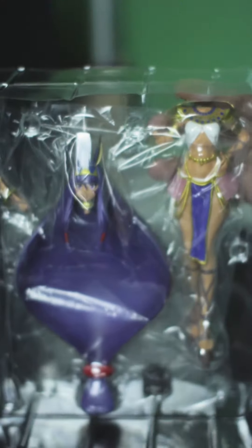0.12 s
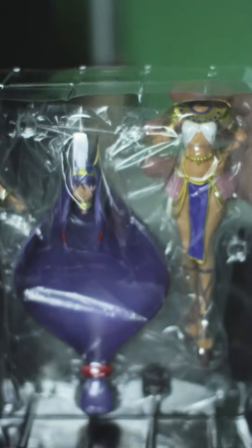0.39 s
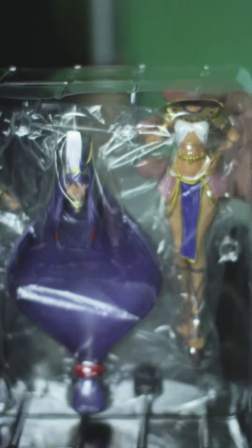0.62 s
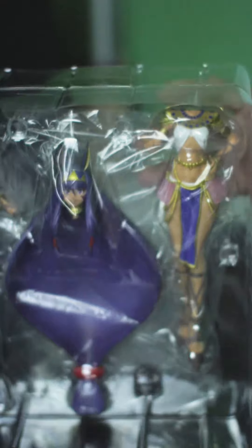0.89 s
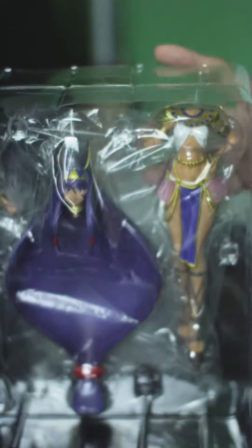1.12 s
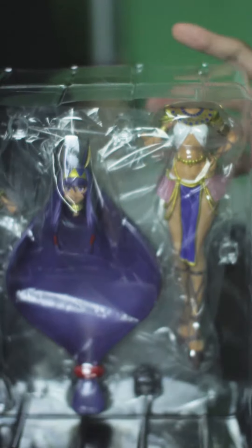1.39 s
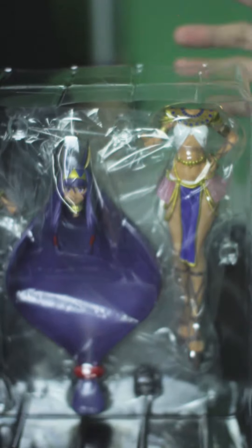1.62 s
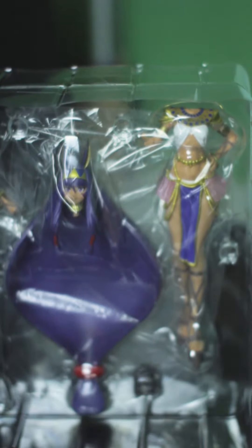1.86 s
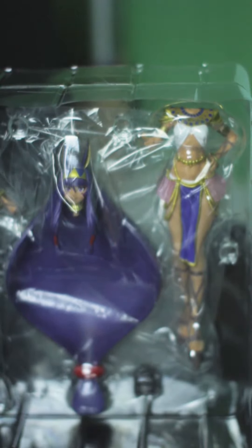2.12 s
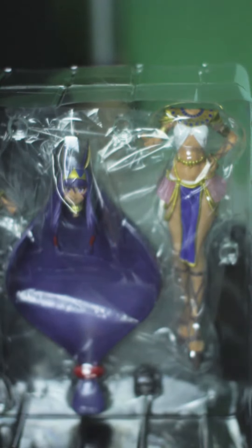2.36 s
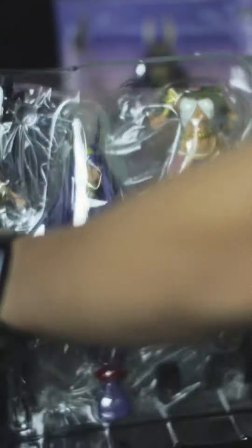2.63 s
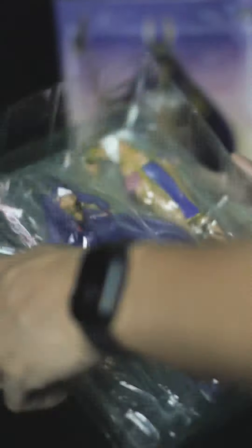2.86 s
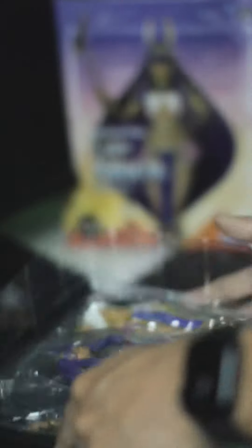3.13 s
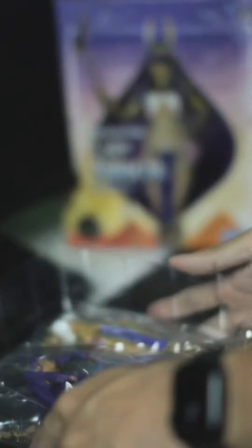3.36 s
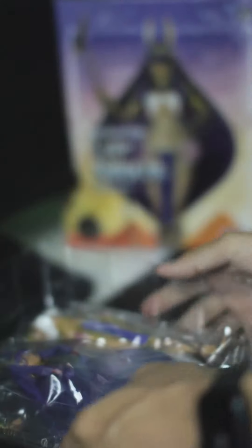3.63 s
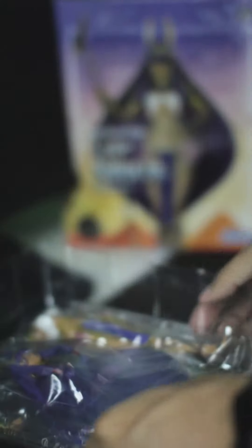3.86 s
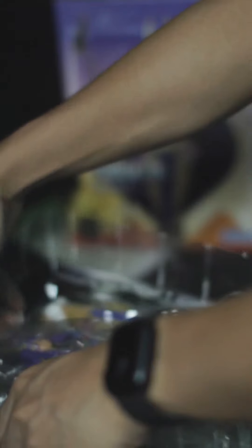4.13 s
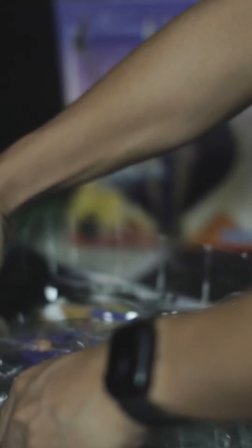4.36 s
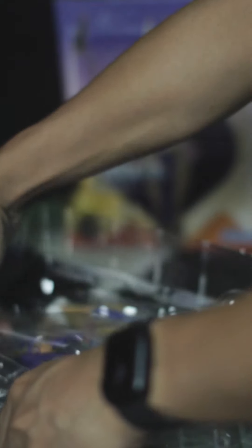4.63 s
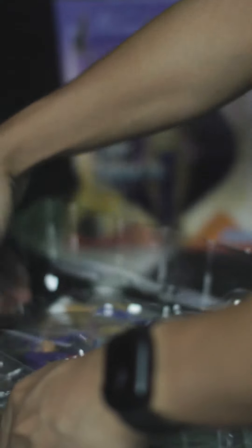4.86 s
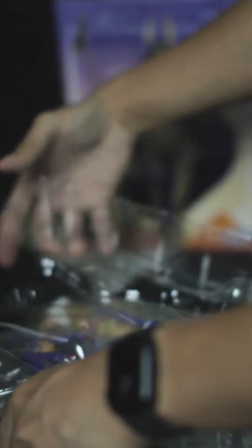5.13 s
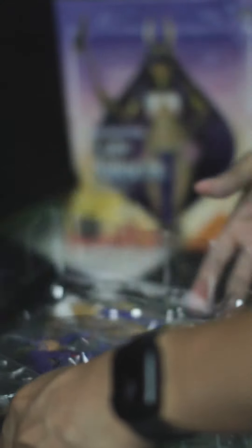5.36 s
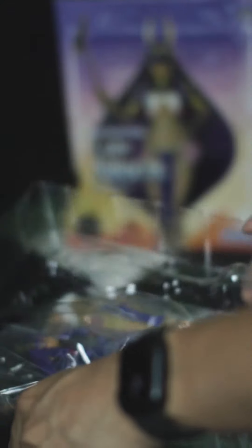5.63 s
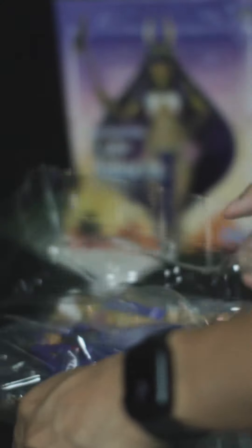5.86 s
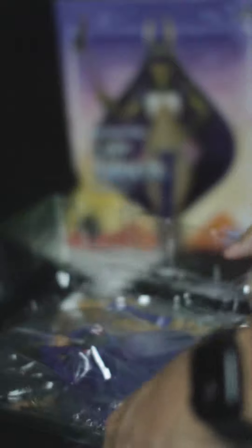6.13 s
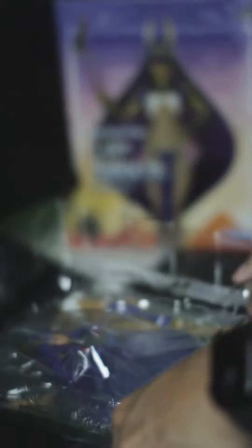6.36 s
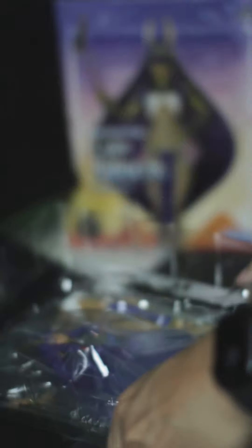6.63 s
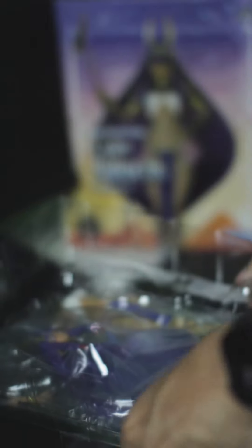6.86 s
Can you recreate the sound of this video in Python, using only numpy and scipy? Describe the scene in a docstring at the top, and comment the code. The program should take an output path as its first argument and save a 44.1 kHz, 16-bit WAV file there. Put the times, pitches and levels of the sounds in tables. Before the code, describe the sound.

Close to the microphone in a small, quiet room, hands handle a stiff clear-plastic tray. At first only faint ticks and light film rustles over a low fan hum; then a burst of crinkling as it is lifted and lowered, dense sharp buckling pops, one very loud snap, dull table thumps and more crackling to the end.

```python
"""Stiff plastic tray prised apart

Hands lift a clear-plastic tray, lay it on a table and prise its halves apart in a small quiet room.
The thin shell's modes ring to buckling pops and to rustling grains under the fingers.
Knocks on the table are swings that slow as they die; shifting adds lumpy rumble. Plastic squeaks briefly
on plastic by regular stick-slip. Two fan hums at close pitches beat over shaped room noise."""
import sys
import numpy as np
from scipy import signal
from scipy.fft import rfft, irfft, next_fast_len
from scipy.io import wavfile

SR = 44100
rng = np.random.default_rng(int(sys.argv[2]) if len(sys.argv) > 2 else 0)


def gain_from_db(level_db):
    """Convert decibel levels to linear amplitude factors (20 dB per decade)."""
    decades = np.asarray(level_db, float) / 20
    return 10 ** decades


def int16_out(signal):
    """Quantize to a 16-bit WAV file."""
    q = np.round(np.clip(np.atleast_2d(signal).T, -1, 1) * 32767)
    wavfile.write(sys.argv[1], SR, q.astype(np.int16))


N = 308700

# Room noise spectrum. Each row: frequency in Hz, relative density in dB.
ROOM_NOISE_SPECTRUM = [(15, -54), (25, -117), (72, -49.5), (102, 2), (223, 20.5), (326, 11), (695, -1),
                       (988, -5.5), (2690, -11), (3520, -6.5), (5280, -14.5), (14800, -18), (16000, -29.5)]
# Fan hums. Each row: pitch in Hz, mean level in dB rms.
FAN_HUMS = [(92.9, -58.5), (100.2, -62)]
# Knocks through the table. Each row: start in seconds, level in dB, nominal pitch in Hz, t60 in seconds.
TABLE_KNOCKS = [(0.121, -24.5, 337, 0.025), (1.198, -30, 696, 0.0035), (2.256, -23.5, 127, 0.057),
                (2.3, -26, 85, .06), (2.356, -15.5, 198, 0.006), (2.376, -33, 85, 0.072),
                (4.536, -17.5, 235, 0.13), (4.101, -38, 120, 0.033), (5.23, -6, 209, 0.018),
                (5.2377, -10.5, 105.6, 0.035), (5.4285, -5, 270, 0.014), (6.131, -28.5, 159, 0.09),
                (6.425, -18, 154, 0.015), (6.268, -25, 206, 0.029), (6.367, -32, 110, 0.031),
                (6.526, -18, 322, 0.054), (6.531, -11.5, 171, 0.023), (6.694, -19.5, 129, 0.023),
                (6.898, -39, 120, 0.07)]
# Tray shifting on the table. Each row: time of the crest in seconds, rumble in dB rms, fade in dB per second.
TRAY_SHIFTS = [(2.26, -35, 111), (3.242, -30.5, 250), (4.11, -49, 95), (4.548, -32.5, 231.5),
               (5.9, -54, 18), (6.3, -45, 48), (6.44, -48, 132), (6.7, -59, 69)]
# Plastic on plastic. Each row: start in seconds, length in seconds, level of the lowest tone in dB,
# slips per second in Hz.
PLASTIC_SQUEAKS = [(2.823, .025, -48.5, 697), (2.867, .055, -38.5, 500)]
# Shell buckling. Each row: start in seconds, relative level in dB, brightness in dB,
# pitch of the buckling panel in Hz, buckling time in seconds.
SHELL_POPS = [(.033, -41, 0, 480, 0.0014), (.084, -48.5, 25.5, 580, 0.0061), (.12, -22, -26, 890, 0.0022),
              (.209, -48, 20.5, 1420, 0.013), (.276, -52.5, 28, 1330, 0.0044),
              (.521, -41.5, 11.5, 490, 0.0055), (.612, -32, -5.5, 370, 0.0065), (.778, -47, -7, 334, .004),
              (1.08, -45.5, 12, 370, 0.008), (1.199, -52.5, 4, 390, 0.0031),
              (1.321, -46.5, 12.5, 970, 0.0061), (2.241, -50, 19, 1290, 0.0074),
              (2.252, -30.5, 8, 1070, 0.014), (2.322, -32, 7.5, 516, 0.009),
              (2.397, -45.5, 31.5, 323, 0.0021), (2.575, -30.5, -10, 560, 0.0026),
              (2.609, -26.5, 17, 1290, 0.028), (2.647, -25, 10, 1250, 0.0044),
              (2.668, -34, -12, 566, 0.0058), (2.695, -34, 10, 465, 0.0064), (2.706, -30, 25, 910, 0.011),
              (2.715, -17, 13, 504, 0.0018), (2.719, -16.5, 13, 514, 0.0067), (2.78, -25, -8, 490, .0044),
              (2.822, -37, 1, 710, 0.0031), (2.931, -27.5, 12, 1010, 0.003),
              (2.983, -36.5, 16.5, 380, 0.0074), (3.101, -56, -11, 1200, 0.0036),
              (3.166, -29.5, 11, 1340, 0.01), (3.231, -12.5, 0.5, 580, 0.0066),
              (3.259, -5.5, -22, 1383, 0.0019), (3.299, -31.5, 15.5, 915, 0.0036),
              (3.385, -21, -25, 660, 0.012), (3.402, -9, -14, 1580, 0.0046), (3.468, -4, -5, 710, 0.0054),
              (3.496, -13.5, -12, 1190, 0.014), (3.507, -17, -9, 640, 0.0028),
              (3.534, -16, -3.5, 626, 0.0032), (3.565, -25, -4.5, 657, 0.0018),
              (3.627, -22, -3.5, 910, 0.0041), (3.727, -35.5, -18, 990, 0.0016),
              (3.823, -37, -6, 304, 0.011), (3.951, -16.5, -21, 1175, .0027), (4.007, -18, 0, 454, 0.01),
              (4.019, -13.5, 0.5, 768, 0.0058), (4.087, -23, -3, 770, 0.0028),
              (4.215, -28, -10, 1220, 0.01), (4.322, -38.5, 12, 890, .005), (4.349, -38.5, 19, 1360, .002),
              (4.46, -48, 18, 780, 0.0066), (4.533, 8.5, -6, 1146, 0.0033), (4.711, -44, 8, 406, 0.0056),
              (4.767, -26, -12, 770, 0.0027), (4.82, -29, 10.5, 600, 0.0043),
              (4.861, -33.5, -3.5, 405, 0.005), (5.007, -42, 4, 481, 0.0035),
              (5.137, -48, 5.5, 312, 0.0035), (5.229, -33, -9, 320, .0013), (5.274, -42, 15, 312, 0.013),
              (5.298, -27.5, 1, 391, 0.013), (5.344, -23, -14, 1320, 0.0039),
              (5.428, -27, -11, 311, 0.0037), (5.501, -38.5, 4, 385, 0.0036), (5.58, -43, 13, 376, 0.0043),
              (5.645, -34, -5, 350, 0.0029), (5.684, -44.5, 17, 640, 0.0006),
              (5.704, -45, 28.5, 900, 0.00084), (5.71, -40, 19, 905, .001), (5.717, -40.5, 11, 1200, .002),
              (5.828, -29.5, 4.5, 1320, 0.0028), (5.964, -10, -9, 778, 0.0044),
              (6.01, -43, 16, 900, 0.0011), (6.021, -30, 12, 393, 0.002), (6.038, -28, -5, 392, 0.0024),
              (6.085, -22, -4.5, 1190, .0037), (6.112, -14, -12, 1270, 0.0022),
              (6.127, -17, -3.5, 1310, 0.0013), (6.145, -29, -8.5, 970, 0.0015),
              (6.19, -20, -14, 1290, 0.0019), (6.265, -11.5, 10.5, 615, 0.0047),
              (6.505, -14.5, 10, 1370, 0.0029), (6.525, -12, -7.5, 480, 0.0027),
              (6.663, -20, -12, 323, 0.0069), (6.731, -41, 11, 382, .004), (6.847, -33.5, 2, 740, 0.014),
              (6.92, -30, -0.5, 370, 0.0016)]
# Loudness of the shell's modes as heard through the microphone, with its resonance near 3.5 kHz.
# Each row: frequency in Hz, relative level in dB.
HEARD_MODES = [(200, -5), (350, -0.5), (700, -1), (1300, 4), (2000, 3), (2800, 8), (3600, 15.5),
               (4600, 6.5), (7500, 8), (12000, 9.5), (15500, 2.5)]
# Centres of the body, middle and treble zones: one frequency in Hz each.
ZONE_CENTRES_HZ = [600, 2400, 8500]
# Hands resting on the shell. Each row: time in seconds, relative level in dB, brightness in dB.
HAND_GRIP = [(0, -51, -8.5), (.3, -79, -12), (.7, -71, 6), (.9, -74, -10.5), (1.65, -67, 3), (2.2, -78, 44),
             (2.6, -48.5, 9), (3.6, -59, -6), (3.78, -70, 7), (3.95, -61.5, 4), (4.4, -57, -2),
             (4.55, -74, -8), (4.9, -63.5, -1), (5.25, -60.5, 11), (5.6, -50.5, -5.5), (6.3, -55, -14),
             (6.45, -70.5, -17), (7, -56, -6)]
# Fingers sliding over or crumpling the film. Each row: start of the hold in seconds, its length in seconds,
# relative level in dB, brightness in dB.
FINGER_STROKES = [(0.466, 0.051, -50, 0), (0.622, 0.019, -67, -18), (0.699, 0.064, -59, 6),
                  (1.09, .03, -72, -3), (1.256, 0.027, -61.5, 6), (1.739, 0.095, -50, 13),
                  (1.903, 0.049, -54.5, 12), (2.003, 0.071, -49.5, 8.5), (2.117, 0.069, -58.5, 23),
                  (2.252, 0.022, -51, 11), (2.32, 0.059, -44.5, 11.5), (2.486, 0.09, -58.5, -7.5),
                  (2.595, 0.14, -40.5, -0.5), (2.805, 0.13, -63.5, -16), (2.925, .06, -50, 11),
                  (3.118, 0.051, -44, -0.5), (3.259, 0.021, -32.5, 6), (3.4, 0.077, -34.5, -1),
                  (3.633, 0.051, -52, -6), (3.836, 0.043, -57, -11), (3.947, 0.045, -45.5, -7.5),
                  (4.098, 0.049, -46, -8), (4.348, 0.015, -44, -2), (4.762, 0.086, -48, -5),
                  (4.98, 0.087, -57, 2.5), (5.307, 0.061, -49.5, -4), (5.671, 0.073, -47.5, -9),
                  (5.762, 0.027, -46.5, -7), (5.83, 0.018, -53, 10), (5.902, 0.13, -45.5, 7),
                  (6.09, 0.11, -48.5, 11), (6.3, 0.091, -58, -1), (6.498, 0.018, -38, 0.5),
                  (6.663, 0.017, -42.5, -5.5), (6.843, 0.019, -50, -7.5)]
# Settling is duller than the pop: extra cut of body, middle and treble in dB; negative raises.
SETTLE_DULLER_DB = (-5, 3, 5.5)

ROOM_NOISE_DB_RMS = -59
HUMS_IN_STEP_S = 0.081   # near here the two hums swell together
ROOM_T60_S, WALL_CUT_HZ, ROOM_WET_DB = 0.13, 2200, -18
MIC_CUT_HZ = 60
SHIFT_RISE_DB_PER_S, TABLE_REST_DB_RMS = 1105, -58
SQUEAK_OVERTONE_DB = -12   # each overtone re the one below
RING_T60_AT_1KHZ_S, RING_SLOPE = 0.05, 0.9   # slope: how fast t60 shortens with pitch
PANEL_DB, PANEL_T60_CYCLES = -3.5, 28   # the buckling panel rings on at its own pitch
STROKE_RISE_DB_PER_S, STROKE_FALL_DB_PER_S = 354, 248.5
RUB_BODY_DB, RUB_TREBLE_DB, RUB_TREBLE_FOLLOWS = 9, -14.5, 0.25   # re the middle; share of brightness
POP_MIDDLE_DB, POP_MIDDLE_FOLLOWS, POP_TREBLE_DB = -3, 0.55, -18.5   # re the body; share of brightness
SETTLE_DB, SETTLE_WAIT_S = -23.5, 0.02   # after each pop the shell crumples back into place
SETTLE_RISE_DB_PER_S, SETTLE_FALL_DB_PER_S = 3600, 333.5


def rms_one(x):
    """Scale to unit rms."""
    return x / np.sqrt(np.mean(x ** 2) + 1e-20)


def at_hz(points, hz):
    """Read a spectrum on a log-frequency axis."""
    points_hz, points_db = np.transpose(points)
    return np.interp(np.log(hz), np.log(points_hz), points_db)


def drift(rate_hz):
    """Slow random wander of rms 1: twice-smoothed noise, made at every 40th sample."""
    r = np.exp(-80 * np.pi * rate_hz / SR)
    noise = rng.standard_normal(N // 40 + 2002)
    slow = signal.lfilter([1], [1, -2 * r, r * r], noise)[2000:]   # drop the run-in
    return np.interp(np.arange(N) / 40, np.arange(len(slow)), rms_one(slow))


def swell_db(t, start, length, rise, fall):
    """Rise up to start, hold at 0 dB for length, fall; one row for each event."""
    end = np.reshape(start + length, (-1, 1))
    start = np.reshape(start, (-1, 1))
    return -rise * np.maximum(start - t, 0) - np.reshape(fall, (-1, 1)) * np.maximum(t - end, 0)


def ring(drive, hz, t60):
    """Resonator: a unit click sets a sine of initial height 1 ringing."""
    r = gain_from_db(-60 / (SR * t60))
    w = 2 * np.pi * min(hz, 16000) / SR
    return signal.lfilter([0, np.sin(w)], [1, -2 * r * np.cos(w), r * r], drive)


def background():
    """Steady spectrally shaped room noise and two hums of wavering level and phase."""
    bins_hz = np.maximum(np.arange(N // 2 + 1) * SR / N, 1)
    spectrum = rfft(rng.standard_normal(N)) * gain_from_db(at_hz(ROOM_NOISE_SPECTRUM, bins_hz))
    out = rms_one(irfft(spectrum, N)) * gain_from_db(ROOM_NOISE_DB_RMS)
    t = np.arange(N) / SR
    for hz, db in FAN_HUMS:
        level = np.sqrt(2) * gain_from_db(db + 0.3 * drift(3.1))
        out += level * np.sin(2 * np.pi * hz * (t - HUMS_IN_STEP_S) + 0.2 * drift(0.46))
    return out


def room(x):
    """Ten feedback delays, duller on every round."""
    size = next_fast_len(N + SR)
    w = 2 * np.pi * np.arange(size // 2 + 1) / size
    wall = 1 / (1 + 1j * w * SR / (2 * np.pi * WALL_CUT_HZ))
    echoes = 0
    for k, lag_s in enumerate(rng.uniform(0.008, 0.03, 10)):
        loop = gain_from_db(-60 * lag_s / ROOM_T60_S) * wall * np.exp(-1j * w * round(lag_s * SR))
        echoes = echoes + (-1) ** k * loop / (1 - loop)
    return irfft(rfft(x, size) * echoes, size)[:N]


def table():
    """A knock swings fast at first, then ever slower as it dies; shifting adds lumpy low rumble."""
    knocks = np.zeros(N + 4000)
    t = np.arange(4000) / SR
    for s, db, hz, t60 in TABLE_KNOCKS:
        cycles = hz * t60 * 0.212 * np.log(1 + t / (t60 * 0.1693))   # starts at 1.25 hz
        knocks[round(s * SR):][:len(t)] += gain_from_db(db - 60 * t / t60) * np.sin(2 * np.pi * cycles)
    band = signal.butter(3, [45, 200], "band", fs=SR, output="sos")
    low = signal.sosfilt(band, rng.standard_normal(N))
    rumble = rms_one(low * gain_from_db(2.8 * drift(51)))
    crest, db, fade = np.transpose(TRAY_SHIFTS)
    swells = gain_from_db(swell_db(np.arange(N) / SR, crest, 0, SHIFT_RISE_DB_PER_S, fade))
    return knocks[:N] + rumble * (gain_from_db(TABLE_REST_DB_RMS) + gain_from_db(db) @ swells)


def squeaks():
    """Regular stick-slip: a short wavering tone with two overtones."""
    out = np.zeros(N)
    for s, length, db, hz in PLASTIC_SQUEAKS:
        t = np.arange(round(length * SR)) / SR
        waver = 1.3 * np.cumsum(rng.standard_normal(len(t))) / np.sqrt(len(t))
        phase = 2 * np.pi * hz * t + waver
        tone = sum(gain_from_db(SQUEAK_OVERTONE_DB * k) * np.sin((k + 1) * phase) for k in range(3))
        out[round(s * SR):][:len(t)] += gain_from_db(db) * np.sqrt(np.sin(np.pi * t / length)) * tone
    return out


def zone_db(hz, body, middle, treble):
    """Level of a mode, between the levels of the three zones."""
    place = np.interp(np.log(hz), np.log(ZONE_CENTRES_HZ), np.arange(3))
    return body * max(1 - place, 0) + middle * (1 - abs(place - 1)) + treble * max(place - 1, 0)


def pop_zones():
    """Body, middle and treble level of every pop in dB."""
    _, level, bright, _, _ = np.transpose(SHELL_POPS)
    return level, level + POP_MIDDLE_DB + POP_MIDDLE_FOLLOWS * bright, level + POP_TREBLE_DB + bright


def rub_zones(level, bright):
    """Body, middle and treble level of a rub in dB; brightness takes from the body."""
    return level + RUB_BODY_DB - bright, level, level + RUB_TREBLE_DB + RUB_TREBLE_FOLLOWS * bright


def rustle_db(t):
    """Grip, strokes and the settling after pops add up in power, zone by zone."""
    s, level, bright = np.transpose(HAND_GRIP)
    grip = rub_zones(np.interp(t, s, level), np.interp(t, s, bright))
    start, length, level, bright = np.transpose(FINGER_STROKES)
    stroke = gain_from_db(2 * swell_db(t, start, length, STROKE_RISE_DB_PER_S, STROKE_FALL_DB_PER_S))
    settle_start = np.transpose(SHELL_POPS)[0] + SETTLE_WAIT_S
    settle = gain_from_db(2 * swell_db(t, settle_start, 0, SETTLE_RISE_DB_PER_S, SETTLE_FALL_DB_PER_S))
    zones = []
    for held, rubbed, popped, dull in zip(grip, rub_zones(level, bright), pop_zones(), SETTLE_DULLER_DB):
        power = gain_from_db(2 * held) + gain_from_db(2 * rubbed) @ stroke + gain_from_db(2 * (popped + SETTLE_DB - dull)) @ settle
        zones.append(10 * np.log10(power))
    return zones


def grains(pressure, per_s, spread_db, clump_db):
    """Stick-slip of skin and creased film: uneven clicks that come in clumps; rms 1."""
    sizes = gain_from_db(spread_db * np.minimum(rng.exponential(1, N), 4)) * rng.choice([-1, 1], N)
    clicks = sizes * (rng.random(N) < per_s / SR)
    return rms_one(clicks * gain_from_db(clump_db * (pressure + 0.42 * drift(7))))


def bucklings():
    """Each pop is a crack and a longer crumbling force; also gives the latest pop at each sample."""
    crack, crumble, which = np.zeros(N + 6000), np.zeros(N + 6000), np.zeros(N, int)
    t = np.arange(6000) / SR
    shape = (len(SHELL_POPS), len(t))
    noise = rng.standard_normal(shape) * gain_from_db(5.26 * rng.standard_normal(shape))
    for k, (s, *_, length) in enumerate(SHELL_POPS):
        start = round(s * SR)
        attack = 1 - np.exp(-t / (0.057 * length))
        for force, lasts in ((crack, length / 3), (crumble, length)):
            burst = noise[k] * attack * (np.exp(-t / lasts) + 0.35 * np.exp(-t / (3.4 * length)))
            force[start:start + len(t)] = burst / np.sqrt(np.sum(burst ** 2))   # unit energy
        which[start:] = k
    return crack[:N], crumble[:N], which


def shell(count=80):
    """Pops and rubbing drive one dense set of overlapping modes; the treble feels mostly the crack."""
    panel_hz = np.transpose(SHELL_POPS)[3]
    crack, crumble, which = bucklings()
    pressure = drift(36)
    snaps = grains(pressure, per_s=45, spread_db=2.5, clump_db=0.5)   # single creases flip over
    rubbing = []   # one for each zone, with more snaps higher up
    for share in (0.1, 0.5, 0.6):
        rubbing.append(share * snaps + grains(pressure, per_s=2800, spread_db=1.5, clump_db=2.5))
    pitches = np.geomspace(170, 15500, count) * np.exp(rng.normal(0, 0.01, count))
    scatter = rng.standard_normal((len(SHELL_POPS), count))
    sides = rng.choice([-1, 1], (len(SHELL_POPS), count))   # a pop pushes or pulls each mode
    t = np.arange(0, N + 64, 64)   # rub levels move in steps of 64 samples
    rubbed, popped = rustle_db(t / SR), pop_zones()
    # moving fingers free and damp groups of five modes
    touch = [np.append(drift(2.6), np.zeros(64))[::64][:len(t)] for _ in range(count // 5)]
    out = np.zeros(N)
    for k, hz in enumerate(pitches):
        t60 = RING_T60_AT_1KHZ_S * (max(hz, 600) / 1000) ** -RING_SLOPE
        below = 4.46 * np.maximum(np.log2(panel_hz / hz), 0)   # modes below the panel's pitch move less
        blow = sides[:, k] * gain_from_db(zone_db(hz, *popped) + 1.9 * scatter[:, k] - below - 19)
        sharp = hz / (hz + 1800)
        pop_drive = (sharp * crack + (1 - sharp) * crumble) * blow[which]
        rub = np.repeat(gain_from_db(zone_db(hz, *rubbed) + 3.07 * touch[k // 5] - 21), 64)[:N]
        zone = np.searchsorted(ZONE_CENTRES_HZ, hz / (2 + k % 2))   # zones interleave at their border
        evened = np.sqrt(4 * np.log(1000) / (t60 * SR))   # equal loudness whatever the decay
        rub_drive = rubbing[zone] * rub * evened
        out += (-1) ** k * gain_from_db(at_hz(HEARD_MODES, hz)) * ring(pop_drive + rub_drive, hz, t60)
    for k, (s, db, _, hz, _) in enumerate(SHELL_POPS):
        near = slice(round(s * SR), round(s * SR) + 8000)
        push = (crumble * (which == k))[near]
        out[near] += gain_from_db(db + PANEL_DB) * ring(push, hz, PANEL_T60_CYCLES / hz)
    # the shell's sound is cut below 130 Hz
    return signal.sosfilt(signal.butter(4, 130, "high", fs=SR, output="sos"), out)


def scene():
    """The tray close to the microphone, its room sound, the table and the background."""
    tray = shell() + squeaks()
    return (tray + gain_from_db(ROOM_WET_DB) * room(tray) + table() + background())[None, :]


def band_limit(x):
    """A steep low-pass at the top of the band."""
    return signal.sosfilt(signal.butter(12, 15900, fs=SR, output="sos"), x)


def record(dry):
    """The microphone cuts the deep bass; the input clips at full scale."""
    heard = signal.sosfilt(signal.butter(2, MIC_CUT_HZ, "high", fs=SR, output="sos"), dry)
    return band_limit(np.clip(heard, -1, 1))


dry = scene()
out = record(dry)
int16_out(out)
```